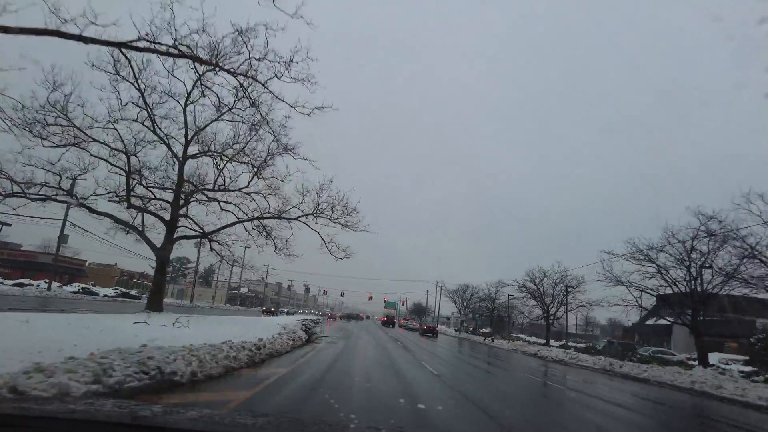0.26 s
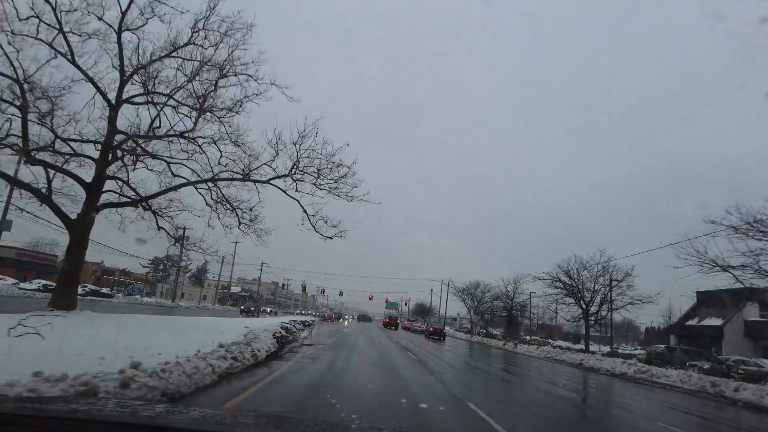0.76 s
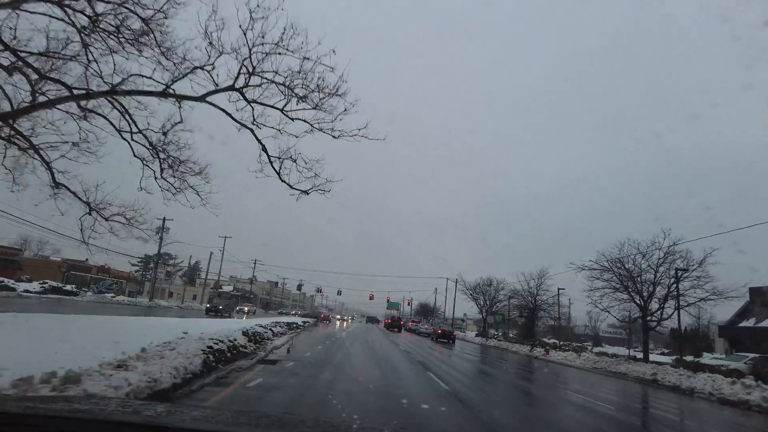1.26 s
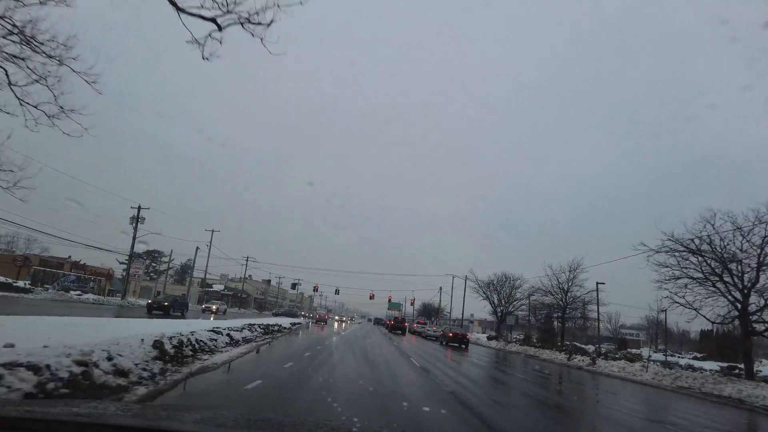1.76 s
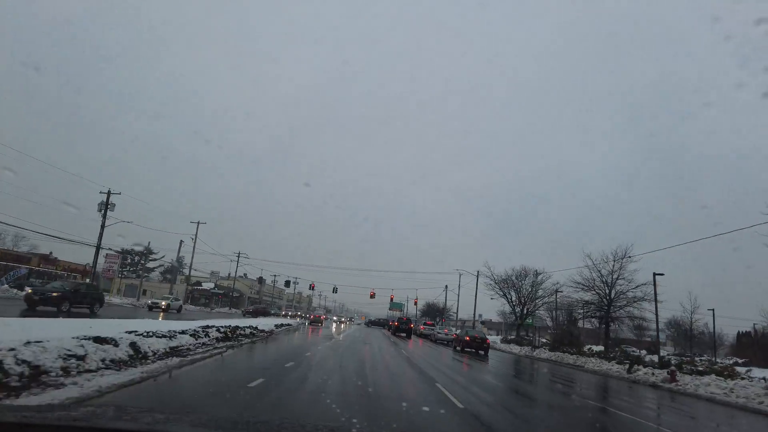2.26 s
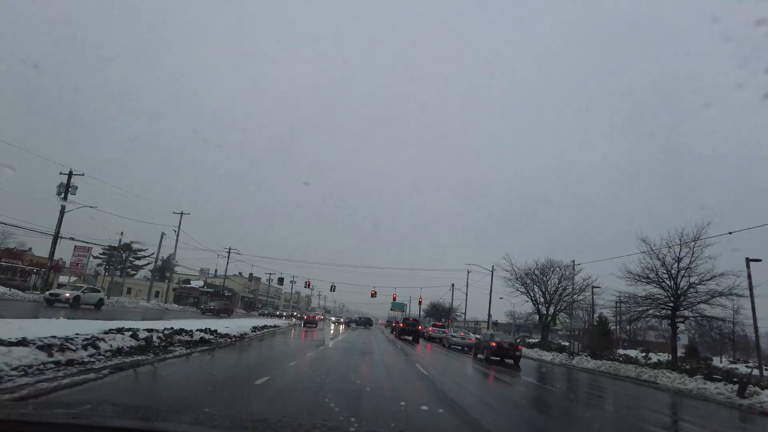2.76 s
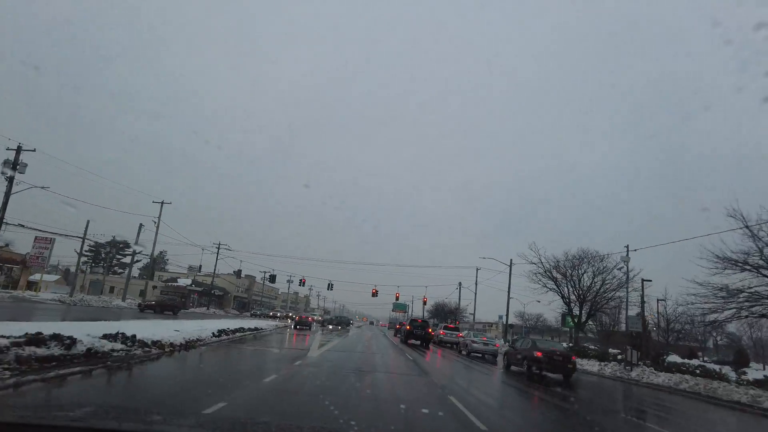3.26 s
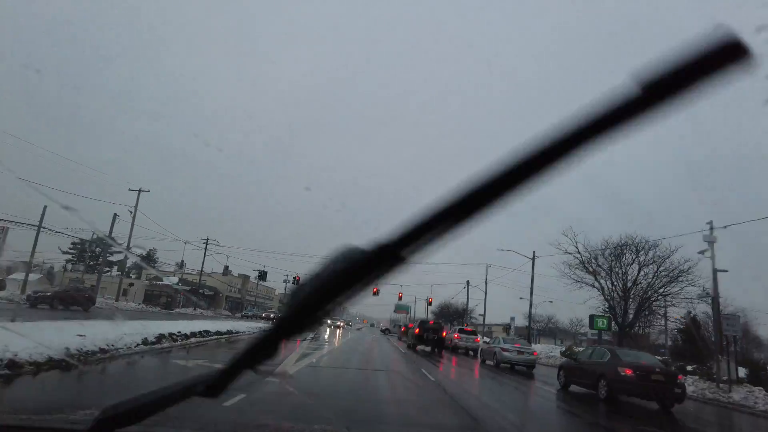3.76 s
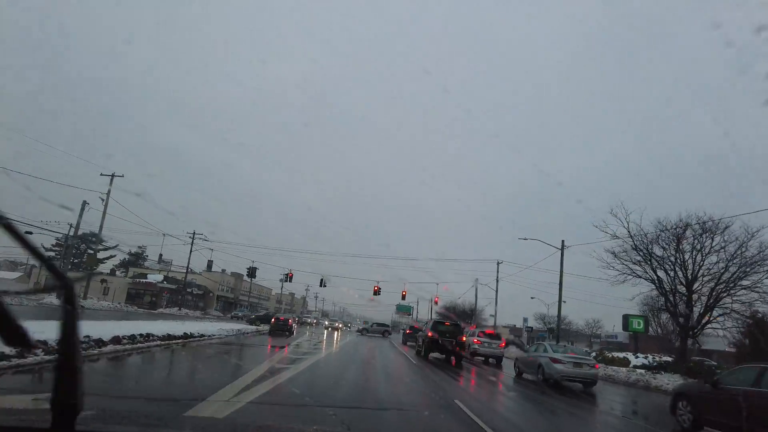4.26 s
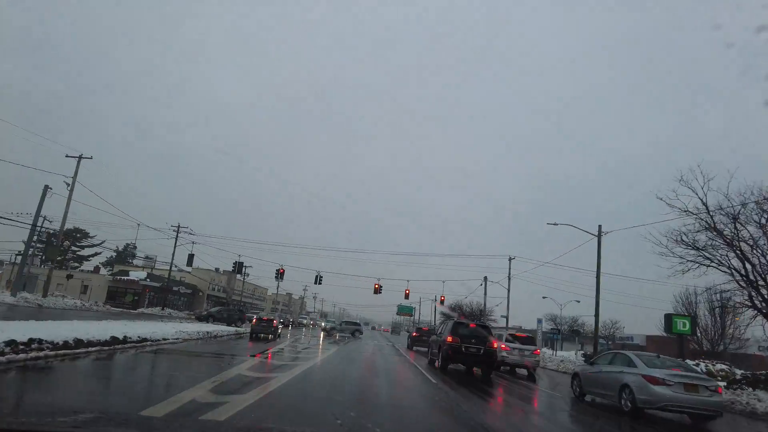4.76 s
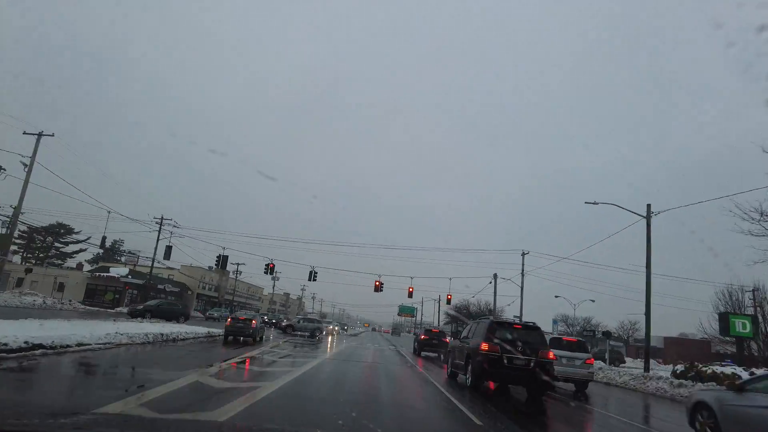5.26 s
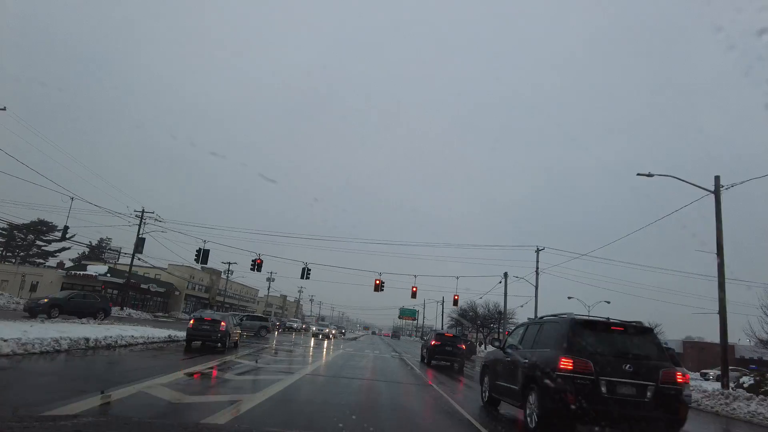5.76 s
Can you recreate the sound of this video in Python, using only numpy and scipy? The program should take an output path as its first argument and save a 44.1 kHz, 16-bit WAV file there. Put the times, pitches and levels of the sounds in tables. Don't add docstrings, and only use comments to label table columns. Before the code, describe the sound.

Steady, bassy car interior with a microphone close to the windscreen. Bumps make the cabin throb at very low pitch over tyre roar, brief panel hums and gentle wet hiss, with a barely audible fan whine behind. One wiper sweep comes late: soft thud, light ticks, a slip of rubber, one clear sharp clack, then a quiet wet scrape and tiny clicks as it settles. Tyre hiss eases as the car slows.

```python
import sys
import numpy as np
from scipy import signal
from scipy.io import wavfile
from scipy.ndimage import uniform_filter1d

SR = 44100
rng = np.random.default_rng(int(sys.argv[2]) if len(sys.argv) > 2 else 0)


def to_wav(sig):
    pcm = np.clip(np.atleast_2d(sig), -1, 1) * 32767
    pcm = np.round(pcm).astype(np.int16)
    wavfile.write(sys.argv[1], SR, pcm.T)


def ratio(d):
    e = np.asarray(d, float) / 20
    return 10 ** e


N = 265923

# (time [s], level [dB], width [s], pitch [Hz])
BODY_BUMPS = [(0.086, -29.5, 0.05, 33.46), (0.162, -25.5, 0.051, 35.2), (0.255, -28, 0.093, 39.36),
              (0.352, -31, 0.068, 36.64), (0.447, -28.5, 0.13, 36.96), (0.775, -32.5, 0.055, 35.84),
              (0.882, -35.5, 0.081, 36.58), (1.013, -32, 0.04, 37.45), (1.072, -31.5, 0.048, 36.86),
              (1.141, -29, 0.044, 36.8), (1.226, -33.5, 0.11, 38.85), (1.307, -32.5, 0.054, 38.72),
              (1.416, -28.5, 0.052, 35.05), (1.493, -29, 0.11, 40.06), (1.552, -31.5, 0.06, 37.24),
              (1.747, -24.5, 0.06, 37.72), (1.83, -33, 0.056, 35.42), (2.001, -25.5, 0.099, 38.56),
              (2.092, -33.5, 0.063, 30.83), (2.182, -28, 0.051, 35.72), (2.398, -33.5, 0.13, 36.24),
              (2.468, -34, 0.044, 35.22), (2.567, -27.5, 0.046, 38.54), (2.748, -32.5, 0.13, 34.52),
              (2.889, -31.5, 0.042, 40.21), (2.965, -32, 0.059, 38.1), (3.08, -37, 0.16, 39.25),
              (3.198, -33.5, 0.074, 42.03), (3.263, -33, 0.045, 33.4), (3.336, -35, 0.056, 38.13),
              (3.473, -29.5, 0.11, 36.17), (3.623, -31, 0.048, 37.18), (3.761, -31.5, 0.046, 38.98),
              (3.846, -32.5, 0.041, 35.33), (3.914, -33.5, 0.042, 37.63), (4.022, -33.5, 0.045, 36.5),
              (4.251, -38, 0.078, 39.82), (4.406, -25.5, 0.03, 34.84), (4.509, -33, 0.097, 37.18),
              (4.622, -35.5, 0.051, 40.9), (4.781, -35.5, 0.084, 31.75), (4.846, -35, 0.025, 36.33),
              (5.067, -31, 0.04, 33.03), (5.16, -37.5, 0.046, 38.8), (5.218, -36, 0.04, 40.2),
              (5.306, -32.5, 0.049, 39.76), (5.681, -32, 0.019, 37.05), (5.827, -32.5, 0.3415, 39.32),
              (5.929, -44.5, 0.056, 38.5)]
# (time [s], level [dB], width [s], pitch [Hz])
FINAL_BUMP = (6.03, -31.5, .06, 38)
# (frequency [Hz], density [dB per Hz])
HEAVE_SPECTRUM = [(7.1, -35.5), (12, 0.5), (24, 3), (30, -7.5), (46, -2.5), (51, -4), (57, -3.5), (62, -19),
                  (70, -29.5), (91, -54), (150, -120)]
BOOM_REST_DB = -43.5

# (frequency [Hz], density [dB per Hz])
ROAR_SPECTRUM = [(38, -33), (64, 4), (70, -7), (118, -7), (145, -9), (177, -11), (252, -21), (283, -18.5),
                 (400, -21), (520, -48.5), (880, -120)]
# (frequency [Hz], width [Hz], level [dB])
PANEL_MODES = [(83.2, 16, -54.5), (95.1, 21, -57.5), (119.6, 16, -57.5), (170.7, 23, -60.5),
               (288.8, 53, -64.5), (398, 38, -67.5)]
# (frequency [Hz], density [dB per Hz])
HISS_SPECTRUM = [(120, -24.5), (200, 3), (254, -9), (284, -6), (330, -6.5), (475, -7.5), (610, -9.5),
                 (867, -11.5), (935, -13.5), (1580, -20.5), (4000, -38.5), (5200, -62), (8800, -120)]
# (frequency [Hz], density [dB per Hz])
SPRAY_SPECTRUM = [(1760, -30), (3000, -3.5), (3670, -20.5), (4600, -5), (4950, -10.5), (7590, -12.5),
                  (10900, -20.5), (12200, -20), (12800, -22.5), (16600, -55), (22000, -120)]
# (time [s], coarseness [dB], standing water [dB])
ROAD_SURFACE = [(0, -0.5, 2.5), (.3, -3, 1), (.46, -0.5, -0.5), (.74, -0.5, 0), (1.62, 0, 1.5),
                (1.9, 1.5, -0.5), (2.77, 0, -1), (3.05, 0, 1.5), (3.4, 1, -0.5), (4.05, 0.5, -0.5),
                (4.35, -2, 1.5), (4.8, 2.5, 1), (5.16, -2, -2), (5.4, -1.5, 1.5), (6.03, 0, 2)]
ROAR_DB, HISS_DB, SPRAY_DB = -47, -55, -88.5
ROAR_DB_PER_S, HISS_DB_PER_S, SPRAY_DB_PER_S = 0.04, -0.5754, -0.57
SPRAY_TOP_HZ = 12900
SAGGING_PANEL, PANEL_SAG_HZ_PER_S = 3, 4.1
# (start frequency [Hz], fall [Hz per s], width
# [Hz], level [dB])
TYRE_BANDS = [(560.6, 30, 70, -69.5), (300.3, 6, 30, -66.5), (2770, 21, 650, -87.5), (4420, 15, 480, -94)]
# (time [s], level [dB], pitch [Hz])
ROAD_SEAMS = [(0.373, -52.5, 186), (0.528, -46.5, 123), (0.547, -59, 183.7), (0.552, -52, 161),
              (0.66, -63, 192), (0.701, -56, 231.4), (0.779, -48.5, 121), (0.826, -51.5, 179),
              (0.934, -49.5, 114), (1.027, -61, 186), (1.233, -55.5, 188.4), (1.294, -64, 225),
              (1.32, -51.5, 125.3), (1.432, -49.5, 69.3), (1.46, -53.5, 181.3), (1.541, -57.5, 177),
              (1.68, -55, 181.3), (1.869, -49.5, 124), (2.001, -48, 104), (2.12, -53, 175.5),
              (2.201, -50, 128.5), (2.209, -48.5, 83.5), (2.308, -49, 90), (2.453, -50.5, 129.3),
              (2.462, -54, 177.5), (2.688, -60, 224.6), (2.739, -50.5, 126.2), (2.766, -54.5, 175.7),
              (2.987, -45, 117.3), (3.287, -53.5, 153), (3.32, -46, 116.4), (3.465, -56.5, 122),
              (3.607, -51.5, 129), (3.635, -45, 88.8), (3.834, -47, 78.2), (3.841, -45.5, 117.4),
              (3.952, -55.5, 155), (4.001, -49, 108.5), (4.141, -57.5, 189), (4.272, -46.5, 72.2),
              (4.385, -48.5, 76.3), (4.398, -51, 177.7), (4.653, -56.5, 208), (4.687, -47.5, 117),
              (4.792, -46.5, 113.2), (5.215, -53.5, 128.8), (5.261, -51.5, 174.5), (5.312, -52.5, 128),
              (5.353, -45, 77), (5.514, -53, 127), (5.532, -50.5, 159.5), (5.714, -51, 129.4),
              (5.779, -47.5, 163.3), (5.793, -45, 75.8), (5.8, -46, 128.5), (5.927, -53, 87.3)]
SEAM_WIDTH_S, SEAM_DB = 0.11, -2

# (time [s], level [dB], low-pass by rubber [Hz])
LINKAGE_BLOWS = [(4.222, -41, 5000), (4.2241, -45, 5000), (4.226, -36.5, 6300), (4.228, -40, 5040),
                 (4.229, -41, 4700), (4.2343, -45.5, 3500), (4.2388, -45.5, 2500), (4.2410, -56, 2470),
                 (4.247, -42, 704), (4.2596, -47, 1080), (5.616, -56, 1800), (5.75, -65, 1600)]
# (frequency [Hz], level [dB], t60 [s])
COWL_MODES = [(248, -6, 0.099), (358, -2.5, 0.069), (426, 0, 0.04), (545, -7.5, 0.092), (672, -4.5, 0.039),
              (754, -9.5, 0.077), (834, -9, 0.023), (940, -10, 0.0049), (1110, -15, 0.077),
              (1256, -6.5, 0.028), (1527, -5.5, 0.036), (2100, -12, 0.027), (2600, -39, 0.026),
              (3500, -37, 0.015)]
KNOCK_TOP_HZ = 12900
# (time [s], level [dB], frequency [Hz], length [s])
WIPER_THUDS = [(3.5806, -33, 175, .024), (3.595, -46, 300, .03), (3.592, -48, 540, .03),
               (4.196, -39, 162, .105), (4.2262, -46, 1300, .0016), (4.238, -46, 440, .016),
               (4.8048, -49, 3400, .0022), (4.2262, -37, 330, .008), (4.2192, -50, 1400, .002),
               (5.6155, -47, 850, .005), (5.7485, -49, 800, .004)]
# (time [s], level [dB], centre [Hz], t60 [s])
RUBBER_SQUEAKS = [(4.1235, -61, 8050, 0.032), (4.155, -71, 6500, .1), (4.162, -66, 4000, .08),
                  (4.184, -64.5, 6300, 0.08), (4.186, -69, 4600, 0.096), (4.194, -72, 8400, .06),
                  (4.682, -76.5, 9040, 0.12), (4.748, -72, 7100, 0.073), (4.765, -78, 9500, .1),
                  (4.772, -57, 1170, 0.09), (4.786, -71, 5200, 0.054), (4.812, -68, 3700, 0.034),
                  (4.758, -77, 5900, .05), (4.804, -72, 7200, 0.046), (4.183, -82, 13000, .08)]
SQUEAK_WIDTH_SHARE, SQUEAK_RISE_S = 0.14, 0.006
# (time [s], level [dB], centre [Hz], t60 [s])
WATER_SCRAPES = [
    (.83, -84, 9500, .08),
    (3.58, -68, 3320, 0.22),
    (3.588, -46.5, 463, 0.22),
    (4.2662, -64, 4700, 0.058),
    (4.14, -76, 5390, 0.8),
    (4.753, -75, 5500, 0.2),
    (4.769, -68, 3600, 0.18),
    (4.78, -66, 2970, 0.13),
    (4.785, -63.5, 2000, 0.2),
]
SCRAPE_WIDTH_SHARE, SCRAPE_RISE_SHARE = 0.53, 0.056
# (time [s], level [dB], rise [s], tilt [dB per kHz])
LIP_FLIPS = [
    (4.129, -52, 0.01, -1),
    (4.829, -66, 0.0021, -0.3),
]
# (frequency [Hz], width [Hz], level [dB])
LIP_MODES = [(3900, 1400, 2), (7360, 1500, -9), (10300, 3500, -4), (13400, 1400, -5)]
FLIP_T60_S = 0.048
# (time [s], level [dB], centre [Hz])
GLASS_DROPS = [(0.021, -76, 6900), (.428, -75, 3700), (.6754, -79, 6500), (1.62, -82, 7500),
               (1.071, -78, 6000), (1.23, -81, 7540), (3.393, -74, 8050), (3.626, -82, 6060),
               (3.717, -69, 4000), (3.797, -76, 3700), (3.86, -67, 3900), (4.025, -70, 4500),
               (4.027, -71, 7900), (4.2255, -57, 4930), (4.482, -75, 4970), (4.67, -75, 5010),
               (3.622, -71, 3380), (4.832, -65, 2200)]
DROP_WIDTH_SHARE, DROP_RISE_S, DROP_T60_S = 0.66, 0.0013, 0.041
TICK_TOP_HZ = 13000
# (time [s], level
# [dB], centre [Hz], length [s])
MORE_PULSES = [(.4278, -57, 3900, 0.0012), (.4282, -58, 2500, .002), (.5002, -67, 4400, .0012),
               (.5002, -72, 6700, .0012), (.5004, -63, 2900, .002), (3.3927, -69, 4040, .0008),
               (3.72, -62, 3000, 0.0017), (3.8606, -60, 2800, .0012), (3.861, -63, 5200, .0007),
               (3.864, -63, 3800, .001), (.8045, -74, 7800, .003), (4.2205, -56, 3800, .0005),
               (4.2212, -64, 6800, .0006), (4.2615, -68, 5500, .001), (4.224, -70, 11800, .001),
               (4.2320, -74, 12000, .001), (4.2445, -72, 8000, .001), (4.2505, -74, 8800, .001),
               (4.2590, -68, 6800, .001), (4.156, -63, 3900, 0.0022), (4.1885, -62, 3300, .002),
               (4.276, -61, 2600, .002), (4.78, -62, 3000, .001), (4.786, -59, 3200, 0.00092),
               (4.7925, -61, 4600, .001), (4.797, -61, 2800, 0.0013), (4.8125, -62, 3700, .003),
               (4.808, -66, 5300, .002), (4.8295, -67, 7300, .006), (4.829, -70, 3950, 0.026),
               (4.137, -57, 4200, 0.0034), (4.190, -64, 6500, .003), (4.8305, -76, 14800, .0015),
               (4.443, -67, 5000, .0008), (2.916, -67, 5000, 0.00088), (5.9226, -70, 3940, .001),
               (3.592, -56, 750, 0.0089), (3.606, -46, 390, 0.017), (3.625, -51, 315, 0.012),
               (3.686, -46, 400, .010), (3.857, -47.5, 400, 0.023)]

# (time [s], frequency [Hz])
WHINE_PITCH = [(0, 843), (.7, 841), (1.5, 845), (2.8, 849), (4.3, 848), (6.03, 843)]
WHINE_DB = -68.5
# (above [Hz], from level [dB], loss [dB per dB])
TREBLE_LOSS = [(8700, -28.5, 3.5), (10400, -31.5, 2.2)]


def evened(x):
    return x / np.sqrt(np.mean(x ** 2) + 1e-20)


def smoothed(x, size, axis=0):
    return uniform_filter1d(uniform_filter1d(x, size=size, axis=axis), size=size, axis=axis)


def curve(rows, column):
    rows = np.array(rows)
    return np.interp(np.arange(N) / SR, rows[:, 0], rows[:, column])


def add(mix, start_s, sound):
    part = mix[round(start_s * SR):][:len(sound)]
    part += sound[:len(part)]


def resonate(x, hz, width_hz):
    turn = np.exp(2j * np.pi * np.cumsum(hz * np.ones(len(x))) / SR)
    r = np.exp(-np.pi * width_hz / SR)
    smooth = signal.lfilter([1 - r], [1, -r], x / turn + 1e-18)
    return 2 * (turn * smooth).real


def wash(spectrum, size, patchy_db, flicker_db):
    frames, bins_hz = 4 * N // size + 5, np.fft.rfftfreq(size, 1 / SR)
    real, imag, patches = rng.standard_normal((frames, len(bins_hz), 3)).T
    flicker = evened(uniform_filter1d(rng.standard_normal(frames), size=3))
    patches = uniform_filter1d(uniform_filter1d(patches, size=8, axis=0), size=8, axis=1)
    patches = evened(patches)
    hz, db = np.transpose(spectrum)
    colour_db = np.interp(np.log(bins_hz + 1), np.log(hz + 1), db, left=-120, right=-120)
    level_db = colour_db[:, None] + patchy_db * patches + flicker_db * flicker
    z = (real + 1j * imag) * ratio(level_db)
    return evened(signal.istft(z, nperseg=size, noverlap=3 * size // 4)[1][:N])


def puffs(rows, top_hz=None):
    out, t = np.zeros(N), np.arange(5000) / SR
    for start_s, db, hz, width_hz, rise_s, t60_s in rows:
        puff = rng.standard_normal(len(t))
        for w in (2.6 * width_hz, 2.6 * width_hz, width_hz):
            puff = resonate(puff, hz, w)
        puff = evened(puff)
        if top_hz:
            puff = signal.sosfilt(signal.butter(12, top_hz, fs=SR, output="sos"), puff)
        rise = np.minimum(t / max(rise_s, 1e-4), 1)
        add(out, start_s, puff * rise * ratio(db - 60 * t / t60_s))
    return out


def pulses(rows):
    out = np.zeros(N)
    for start_s, db, hz, length_s in rows:
        t = np.arange(0, length_s, 1 / SR)
        swell = np.sin(np.pi * t / length_s) ** 2
        add(out, start_s, ratio(db) * swell * np.sin(2 * np.pi * hz * t))
    return out


def boom():
    bump_s, db, width_s, hz = np.transpose(BODY_BUMPS + [FINAL_BUMP])
    t = np.arange(0, N + 64, 64) / SR
    bump_power = ratio(db) ** 2 * np.exp(-(2 * (t[:, None] - bump_s) / width_s) ** 2)
    bump_power = bump_power + ratio(BOOM_REST_DB) ** 2 / len(bump_s)
    power = bump_power.sum(1)
    level = np.interp(np.arange(N) / SR, t, np.sqrt(power))
    pitch_hz = np.interp(np.arange(N) / SR, t, bump_power @ hz / power)
    nudge = evened(smoothed(rng.standard_normal(N), 2500))
    turns = np.cumsum(pitch_hz * (1 + 0.085 * nudge)) / SR
    mode = -np.sqrt(2) * level * np.cos(2 * np.pi * (turns - turns[-1]))
    slow = np.sqrt(uniform_filter1d(level ** 2, size=15000) + ratio(-76.5))
    heave = ratio(-8.5) * slow * wash(HEAVE_SPECTRUM, 8192, patchy_db=-0.5, flicker_db=-2.5)
    return mode + heave


def tyre_roar():
    t = np.arange(N) / SR
    roar_db = ROAR_DB + ROAR_DB_PER_S * t + curve(ROAD_SURFACE, column=1)
    roar = ratio(roar_db - 3.5) * wash(ROAR_SPECTRUM, 8192, patchy_db=0.0, flicker_db=0.5)
    panels = np.zeros(N)
    for i, (hz, width_hz, db) in enumerate(PANEL_MODES):
        if i == SAGGING_PANEL:
            hz = hz - PANEL_SAG_HZ_PER_S * (t - t.mean())
        shake = resonate(rng.standard_normal(N), hz, width_hz)
        panels += ratio(db) * evened(resonate(shake, hz, width_hz))
    return roar + ratio(roar_db - roar_db.mean()) * panels


def tyre_hiss():
    hiss_db = HISS_DB + HISS_DB_PER_S * np.arange(N) / SR
    return ratio(hiss_db + 0.1) * wash(HISS_SPECTRUM, 1024, patchy_db=0.53, flicker_db=0.5)


def spray():
    spray_db = SPRAY_DB + SPRAY_DB_PER_S * np.arange(N) / SR + curve(ROAD_SURFACE, column=2)
    water = ratio(spray_db + 4.0) * wash(SPRAY_SPECTRUM, 512, patchy_db=2.8, flicker_db=1.5)
    return signal.oaconvolve(water, signal.firwin(301, SPRAY_TOP_HZ, fs=SR), "same")


def seams():
    out, t = np.zeros(N), np.arange(-6000, 6000) / SR
    for seam_s, db, hz in ROAD_SEAMS:
        tone = np.sin(2 * np.pi * (hz * t + rng.random()))
        swell = np.exp(-2 * (t / SEAM_WIDTH_S) ** 2)
        add(out, seam_s + t[0], np.sqrt(2) * ratio(db + SEAM_DB) * swell * tone)
    return out


def tyre_bands():
    out, t = np.zeros(N), np.arange(N) / SR
    for start_hz, fall_hz_per_s, width_hz, db in TYRE_BANDS:
        hz = start_hz - fall_hz_per_s * t
        shake = resonate(rng.standard_normal(N), hz, width_hz)
        out += ratio(db) * evened(resonate(shake, hz, width_hz))
    return out


def wiper_knocks():
    out, t = np.zeros(N), np.arange(8000) / SR
    for blow_s, db, dull_hz in LINKAGE_BLOWS:
        ring = np.zeros(len(t))
        for hz, mode_db, t60_s in COWL_MODES:
            phase = rng.uniform(0.2, 0.82)
            ring += ratio(mode_db - 60 * t / t60_s) * np.sin(2 * np.pi * (hz * t + phase))
        grit = signal.lfilter([0.2], [1, -0.8], rng.standard_normal(len(t)))
        crack = 1.1 * grit * ratio(-60 * t / 0.045)
        blow = (ring + crack) * np.minimum(t / 0.0004, 1)
        add(out, blow_s, ratio(db) * signal.lfilter(*signal.butter(3, dull_hz, fs=SR), blow))
    return signal.oaconvolve(out, signal.firwin(101, KNOCK_TOP_HZ, fs=SR), "same")


def wiper_thuds():
    return pulses(WIPER_THUDS)


def squeaks():
    return puffs([(s, db, hz, SQUEAK_WIDTH_SHARE * hz, SQUEAK_RISE_S, t60_s)
                  for s, db, hz, t60_s in RUBBER_SQUEAKS], TICK_TOP_HZ)


def scrapes():
    return puffs([(s, db, hz, SCRAPE_WIDTH_SHARE * hz, SCRAPE_RISE_SHARE * t60_s, t60_s)
                  for s, db, hz, t60_s in WATER_SCRAPES], TICK_TOP_HZ)


def lip_flips():
    rows = []
    for flip_s, db, rise_s, tilt_db_per_khz in LIP_FLIPS:
        for hz, width_hz, mode_db in LIP_MODES:
            tilt_db = tilt_db_per_khz * (hz - LIP_MODES[0][0]) / 1000
            rows.append((flip_s, db + mode_db + tilt_db, hz, width_hz, rise_s, FLIP_T60_S))
    return puffs(rows)


def drops():
    return puffs([(s, db, hz, DROP_WIDTH_SHARE * hz, DROP_RISE_S, DROP_T60_S)
                  for s, db, hz in GLASS_DROPS], TICK_TOP_HZ)


def more_pulses():
    return pulses(MORE_PULSES)


def fan_whine():
    hz = curve(WHINE_PITCH, column=1)
    waver_db = 1.6 * evened(smoothed(rng.standard_normal(N), 4000))
    line = np.sqrt(2) * ratio(waver_db) * np.sin(2 * np.pi * np.cumsum(hz) / SR)
    skirt = 0.14 * evened(resonate(rng.standard_normal(N), hz, 3.7))
    return ratio(WHINE_DB) * (line + skirt)


def scene():
    car = boom() + tyre_roar() + tyre_hiss() + spray() + seams() + tyre_bands()
    wipers = wiper_knocks() + wiper_thuds() + squeaks() + scrapes() + lip_flips()
    ease = np.minimum(np.arange(N) / (0.004 * SR), 1)
    return (ease * (car + wipers + drops() + more_pulses() + fan_whine()))[None]


def roll_off(x):
    return signal.sosfilt(signal.butter(12, 15300, fs=SR, output="sos"), x)


def record(dry):
    level_db = 10 * np.log10(abs(uniform_filter1d(dry ** 2, size=2500)) + 1e-12)
    for above_hz, from_db, loss_db_per_db in TREBLE_LOSS:
        high_pass = signal.firwin(201, above_hz, pass_zero=False, fs=SR)
        treble = signal.oaconvolve(dry, high_pass[None], "same")
        kept = ratio(-loss_db_per_db * np.maximum(level_db - from_db, 0))
        dry = dry - (1 - kept) * treble
    return roll_off(dry)


dry = scene()
out = record(dry)
to_wav(out)
```